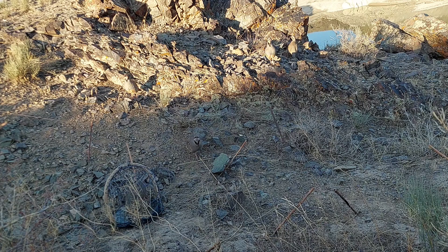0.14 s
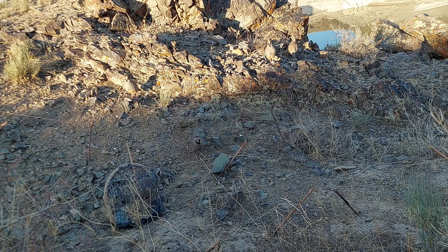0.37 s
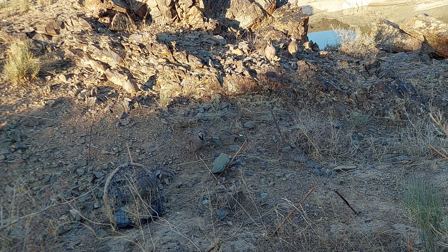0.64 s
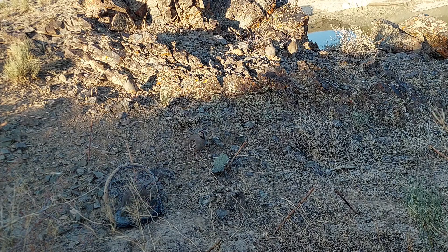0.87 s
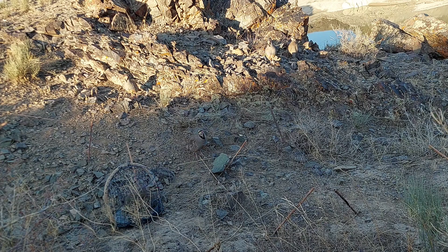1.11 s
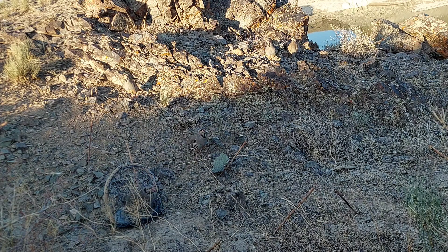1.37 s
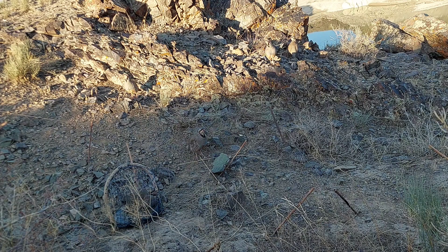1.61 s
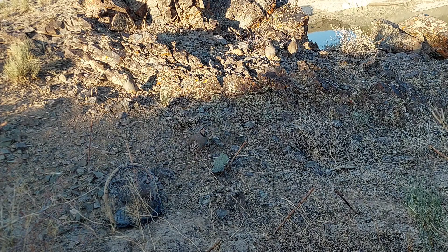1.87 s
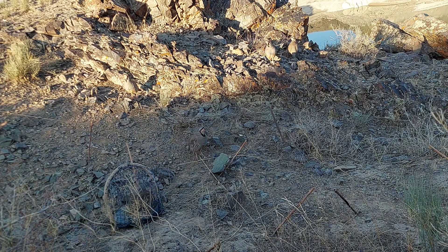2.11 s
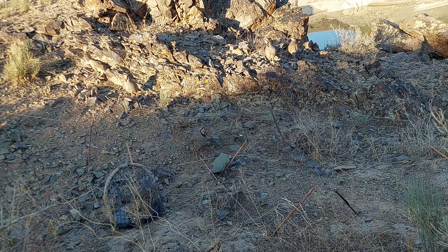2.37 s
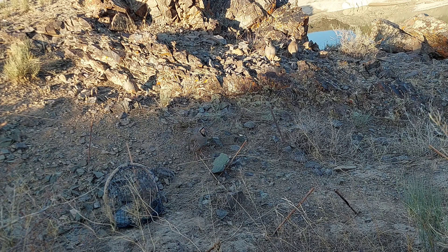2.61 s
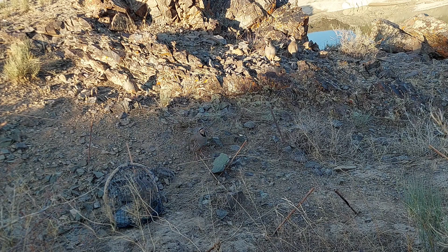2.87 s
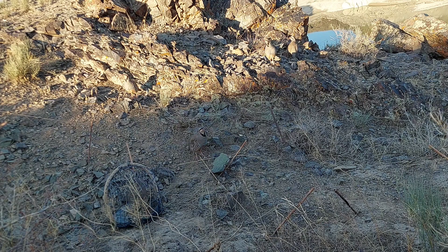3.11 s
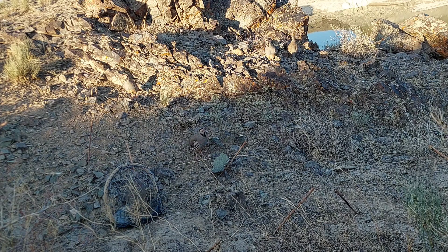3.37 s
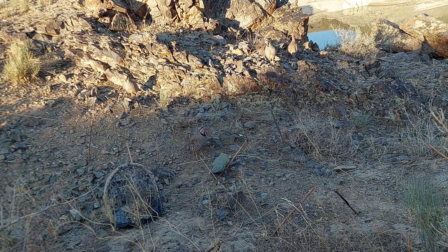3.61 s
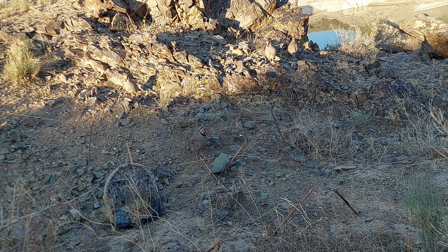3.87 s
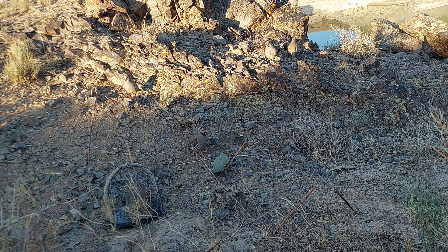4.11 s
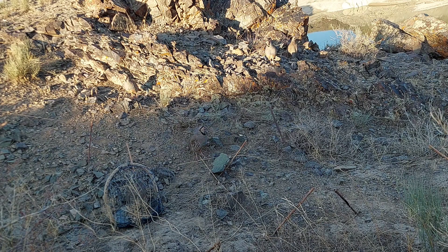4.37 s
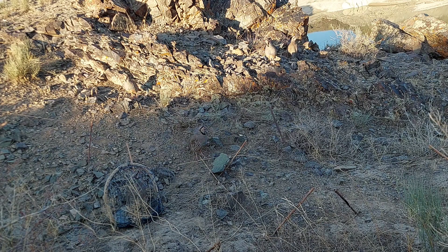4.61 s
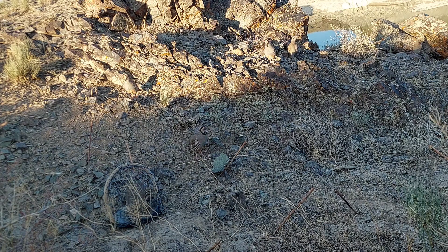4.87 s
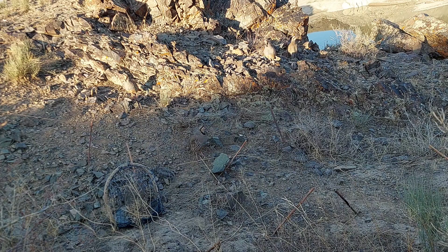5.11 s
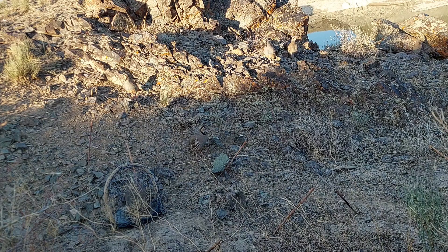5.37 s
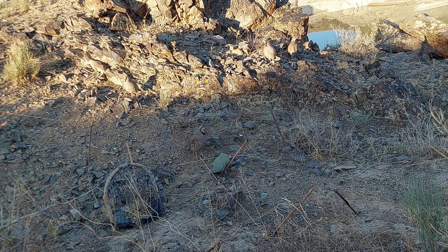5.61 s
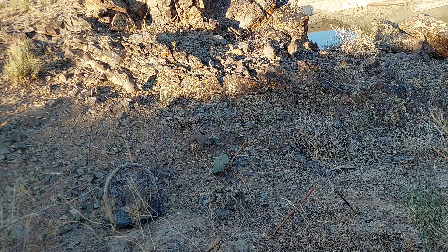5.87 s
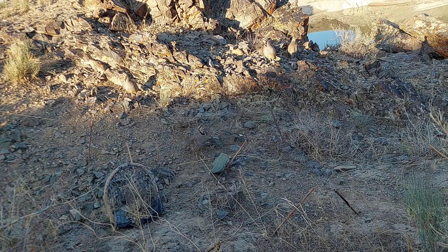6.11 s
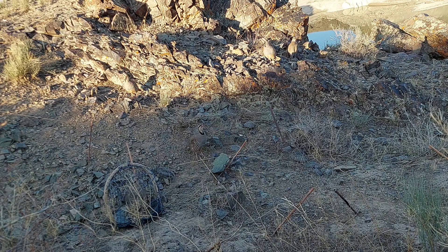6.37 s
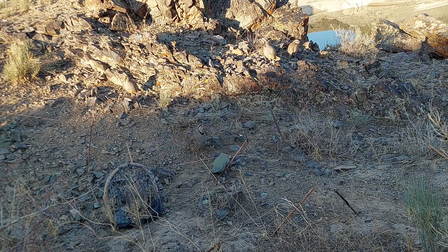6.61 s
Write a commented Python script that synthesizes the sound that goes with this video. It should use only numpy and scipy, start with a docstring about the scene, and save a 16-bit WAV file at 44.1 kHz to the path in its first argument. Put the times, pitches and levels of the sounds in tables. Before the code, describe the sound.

Partridges call outdoors on a dry rocky slope. Hoarse, throbbing clucks come in fast uneven bursts, with softer rounded clucks between them and brief thin squeals gliding upward or breaking down. Gaps shorten and lengthen throughout. Near the end a closer bird gives a few hollow, breathy notes, louder than the rest. Stereo microphone, calls slightly left, dry with only faint short scatter from rocks, quiet low air rumble beneath.

```python
"""Partridges call on a rocky hillside: hoarse clucks, made of pulses that ring chest, throat and beak.
Among them short squealing whistles sound, gliding near sines with overtones.
Near the end a closer bird adds hollow, breathy notes: noise that rings windpipe modes.
Rocks scatter short, dying noise echoes; light air rumbles as bands of stereo noise."""
import sys
import numpy as np
from scipy import signal
from scipy.io import wavfile
from scipy.ndimage import uniform_filter1d

SR = 44100
rng = np.random.default_rng(int(sys.argv[2]) if len(sys.argv) > 2 else 0)


def transcribe(signal):
    """Save signal, clipped to [-1, 1], as a 16-bit WAV file at the path in sys.argv[1]."""
    frames = np.atleast_2d(signal).T
    limited = np.clip(frames, -1, 1)
    pcm = np.round(limited * 32767).astype(np.int16)
    wavfile.write(sys.argv[1], SR, pcm)


def makeup_ratio(level_db):
    """Linear amplitude ratio for a level in decibels (20 dB per factor of ten)."""
    decades = np.asarray(level_db, float) / 20
    return 10 ** decades


N = 297234


def rms_one(x):
    """Normalization: divide by the root mean square to reach unit power."""
    return x / np.sqrt(np.mean(x ** 2) + 1e-20)


def at_hz(points, hz):
    """Linear interpolation of a table on a log-frequency axis."""
    table_hz, values = np.transpose(points)
    return np.interp(np.log(hz), np.log(table_hz), values)


def resonate(x, hz, width_hz):
    """Damped resonator: a pole pair sets centre and bandwidth; the gain is about 1 at the peak."""
    r = np.exp(-np.pi * width_hz / SR)
    poles = [1, -2 * r * np.cos(2 * np.pi * hz / SR), r * r]
    return signal.lfilter([(1 - r * r) / 2, 0, (r * r - 1) / 2], poles, x)


def wander(rate_hz):
    """Low-pass random process of unit spread: a double pole lets only slow chance through."""
    r = np.exp(-2 * np.pi * rate_hz / SR)
    white = rng.standard_normal(N + SR)
    return rms_one(signal.lfilter([1], [1, -2 * r, r * r], white)[SR:])


def swell(length, rise, power):
    """Amplitude envelope: a sine-shaped rise over the share `rise`, then a fall, raised to a power."""
    u, rise = np.linspace(0, 1, length), np.clip(rise, .05, .95)
    return np.sin(np.pi / 2 * np.minimum(u / rise, (1 - u) / (1 - rise))) ** power


def add(out, s, note):
    """Superposition: sum a note into the signal at time s in seconds."""
    at = max(round(s * SR), 0)
    out[at:at + len(note)] += note[:N - at]


def clucks(notes, jitter, hiss, rise, throat_width_hz, windpipe_db, chest_db, low_top_hz, crest,
           sag_below_hz, lift=0.0505, beak_lift=.1):
    """Source-filter voice: membrane pulses ring chest, throat and a beak that opens in mid-note."""
    # Each row: centre in Hz, width of the first of two stages in Hz, relative gain in dB.
    beak_modes = [(2600, 510, 4.5), (3290, 140, 15), (4250, 165, 14.5), (4823, 687, 7.5), (5590, 1200, -7),
                  (7300, 1200, -82.5), (11930, 960, -10), (13800, 1500, -17)]
    out, shake, breath = np.zeros(N), wander(90.), rng.standard_normal(N)
    stretch = 1.6   # leaves room for the soft onset and decay
    for s, ms, db, throat_hz, bright_db, pulse_hz in notes:
        start = s - ms * (stretch - 1) / 2000
        span = np.arange(round(ms * stretch * SR / 1000))
        u = span / len(span)
        here = np.clip(round(start * SR) + span, 0, N - 1)
        # the pulse rate climbs through a note, but sags in slow ones
        trend = rise * np.sign(pulse_hz - sag_below_hz)
        hz = pulse_hz * (1 + trend * (u - .5)) * np.exp(jitter * shake[here])
        cycle = np.cumsum(hz) / SR % 1
        pulses = np.diff(cycle, prepend=0) < 0
        # air hisses through just after each opening
        source = rms_one(pulses - np.mean(pulses)) + hiss * breath[here] * np.exp(-2.5 * cycle)

        throat = resonate(resonate(source, throat_hz, throat_width_hz), throat_hz, 4.2 * throat_width_hz)
        windpipe = resonate(resonate(source, 1147, 650), 600, 910)
        chest = resonate(resonate(source, 480, 350), 480, 550)
        low = rms_one(throat) + makeup_ratio(windpipe_db) * rms_one(windpipe) + makeup_ratio(chest_db) * rms_one(chest)
        low = signal.sosfilt(signal.butter(2, low_top_hz, fs=SR, output="sos"), rms_one(low))
        # the throat narrows: reading ever faster makes the resonances climb
        low = np.interp(span * (1 - lift + lift * u), span, low)
        beak = sum(makeup_ratio(g) * resonate(resonate(source, f, w), f, 2 * w) for f, w, g in beak_modes)
        beak = np.interp(span * (1 - beak_lift + beak_lift * u), span, beak)
        opening = swell(len(span), .55, 1.6)

        note = rms_one(low + makeup_ratio(bright_db) * rms_one(beak * opening))
        # steady breath evens the level
        note = note / (uniform_filter1d(note ** 2, size=300) + 0.033) ** 1.61
        add(out, start, makeup_ratio(db) * swell(len(span), crest, 3.4) * note)
    return out


def rasp_notes():
    """Coupled articulation: the throat follows the beak, the pulse rate the time left in the run."""
    # Hoarse rasping throbs.
    # Each row: start in seconds, length in ms before the stretch, level in dB before the evening,
    # brightness of the open beak in dB.
    rasps = [(0.006, 28, -35.5, -13), (0.036, 20, -34, -4.5), (0.064, 67, -38.5, -6.5),
             (0.126, 62, -39, -1), (0.199, 60, -44.5, 2), (0.258, 26, -36, 17), (0.303, 36, -38, -13.5),
             (0.351, 48, -37, -6), (0.401, 22, -35, 33), (0.425, 60, -32, -7), (0.674, 50, -35.5, -4.5),
             (0.736, 16, -37.5, 28), (0.768, 78, -31, -2), (0.851, 25, -37.5, 6), (0.884, 19, -38, 4),
             (0.922, 44, -37.5, 5.5), (0.974, 60, -42.5, -3.5), (1.031, 36, -40, -9.5),
             (1.183, 52, -42, -12.5), (1.23, 32, -31.5, 3.5), (1.268, 12, -33.5, 11), (1.297, 25, -35, 16),
             (1.328, 31, -32, 32), (1.355, 58, -29, 2), (1.413, 30, -37.5, 12), (1.588, 37, -39, -29.5),
             (1.74, 41, -43, -15.5), (1.795, 44, -45, -16), (1.864, 46, -40, -15), (1.915, 36, -40, -8),
             (1.963, 36, -45, -13.5), (2.124, 68, -36.5, -9.5), (2.229, 32, -46.5, 0.5),
             (2.261, 34, -49.5, -7.5), (2.74, 57.6, -42.5, -10.5), (2.776, 15, -35, 11),
             (2.809, 24, -35, 5), (2.833, 41, -36, 11.5), (2.899, 50, -32.5, 7.5), (2.95, 64, -33, -10.5),
             (3.228, 42, -38, -12.5), (3.271, 56, -35.5, -1.5), (3.328, 31, -37.5, 29),
             (3.364, 81, -37, -4), (3.43, 64, -35, 1), (3.492, 56, -30.5, -10), (4.005, 38, -30.5, -7.5),
             (4.045, 24, -30, 9.5), (4.073, 65, -40, 23.5), (4.116, 28, -28.5, 3),
             (4.151, 62, -32.5, -11.5), (4.589, 76, -36, -10.5), (4.665, 95, -30.5, -2.5),
             (4.763, 42, -36, -15.5), (5.061, 42, -51.5, -11.5), (5.172, 90, -33.5, -5),
             (5.238, 54, -32.5, -6.5), (5.3, 36, -31.5, 0), (5.336, 48, -34.5, -6.5), (5.444, 52, -41, -8),
             (5.631, 34, -35, -9), (5.665, 23, -31, -9.5), (5.699, 20, -32, 4), (5.733, 66, -36.5, -3.5),
             (5.803, 56, -37.5, -10), (5.858, 38, -41.5, -13), (6.151, 36, -33, -2.5),
             (6.268, 50, -43.5, 0), (6.317, 41, -41, -12), (6.383, 39, -46.5, -19.5),
             (6.535, 62, -40.5, -8), (6.595, 44, -43.5, -6), (6.689, 79, -37.5, -12)]
    # Throat resonance against beak opening. Each row: brightness in dB, resonance in Hz.
    throat = [(-15, 1115), (-3.5, 1720), (-8, 1780), (20, 1900)]
    # Pulses slow down as a run ends. Each row: seconds to the end of the run, pulse rate in Hz.
    run_down = [(.07, 525.4), (.125, 831.4)]
    pause_s = .065   # a longer silence ends a run
    s, ms, db, bright_db = np.transpose(rasps)
    ends = s + ms / 1000
    run_ends = ends[np.append(s[1:] - ends[:-1] > pause_s, True)]
    left_s = run_ends[np.searchsorted(run_ends, s)] - s
    throat_hz = np.interp(bright_db, *np.transpose(throat))
    pulse_hz = np.interp(left_s, *np.transpose(run_down))
    return zip(s, ms, db, throat_hz, bright_db, pulse_hz)


def cluck_notes():
    """Harmonic tuning: the throat resonance sits at one multiple of the pulse rate."""
    # Soft, evenly voiced clucks.
    # Each row: start in seconds, length in ms before the stretch, level in dB before the evening,
    # mean pulse rate in Hz, brightness of the open beak in dB.
    soft_clucks = [(0.614, 53, -39, 410, -9), (1.066, 50, -40.5, 420.3, -12.5),
                   (1.473, 38, -42.5, 505.4, -11.5), (1.696, 46, -42, 462.5, -13),
                   (2.313, 44, -45, 429.4, -15.5), (2.516, 40, -63, 420, -36), (2.561, 48, -46, 394, -31),
                   (3.079, 50, -41, 396.7, -14), (3.761, 53, -38, 375.6, -25.5), (3.965, 46, -49, 454, -13),
                   (4.428, 42, -38.5, 448.8, -20.5), (4.569, 24, -55, 432, -29.5),
                   (4.951, 40, -46, 507, -20), (5.005, 51, -37.5, 443, -12), (5.39, 65, -40.5, 406, -13.5),
                   (5.56, 40, -40, 559.3, -22), (5.589, 42, -37, 462.3, -10), (5.9, 63, -61, 386, -34),
                   (5.944, 53, -40.5, 369.7, -13), (5.992, 54, -44.5, 712, -15),
                   (6.099, 59, -39.5, 553.4, -12.5)]
    throat_multiple = 2.7
    return [(s, ms, db, throat_multiple * hz, bright_db, hz) for s, ms, db, hz, bright_db in soft_clucks]


def squeals(third_db=-7, under_db=-15):
    """Additive synthesis: gliding near sines with overtones; the middle register locks lines at thirds."""
    # Strength of the octave, by pitch. Each row: pitch in Hz, octave over fundamental in dB.
    octave = [(750, -48), (1050, -58.5), (1600, -2), (1900, -14), (2850, -6.5), (3300, -50.5)]
    fade_ms, waver, flutter_db = 3.5, .02, 3.0   # the last two are spreads: share of pitch, dB
    out, turns, pitch, level = np.zeros(N), 0, wander(55.), wander(40.)
    fade = round(fade_ms * SR / 1000)
    for s, ms, from_hz, to_hz, db in squeal_throbs():
        octave_db = at_hz(octave, from_hz)
        span = np.arange(round(ms * SR / 1000) + 2 * fade)
        here = np.clip(round(s * SR) - fade + span, 0, N - 1)
        # slides steepen, but high rising ones level off
        bend = .4 if 2600 < from_hz < to_hz else 1.6
        slide = np.linspace(0, 1, len(span)) ** bend
        hz = (from_hz + (to_hz - from_hz) * slide) * (1 + waver * pitch[here])
        phase = 2 * np.pi * (turns + np.cumsum(hz) / SR)
        turns = phase[-2 * fade] / (2 * np.pi)   # the next throb carries the swing on
        note = np.sin(phase) + makeup_ratio(octave_db) * np.sin(2 * phase)
        if from_hz < 2100:
            note += makeup_ratio(octave_db + third_db) * np.sin(3 * phase)
        elif 2600 < from_hz < 3000:
            # weaker lines at two thirds and five thirds of the pitch
            note += makeup_ratio(under_db) * (np.sin(2 / 3 * phase) + np.sin(5 / 3 * phase))
            note += makeup_ratio(-30.5) * np.sin(4 * phase) + makeup_ratio(-53) * np.sin(3 * phase)
        edges = np.clip(np.minimum(span, span[::-1]) / (2 * fade), 0, 1)
        gain = np.sqrt(2) * makeup_ratio(db + flutter_db * level[here])
        add(out, s - fade / SR, gain * edges * note)
    return out


def squeal_throbs():
    """Frequency modulation plan: every squeal as throbs (s, ms, from Hz, to Hz, dB) in time order."""
    # Clean squeals, squeals that break downwards, and squeals that shoot upwards.
    # Each row: start in seconds, length in ms between half-faded edges, middle pitch in Hz,
    # level of the fundamental in dB before flutter.
    clean = [(0.012, 11.7, 1824, -47.5), (0.043, 18, 1680, -43.5), (0.134, 23, 3950, -43.5),
             (0.165, 85, 5846, -47), (0.181, 58, 2900, -49), (0.267, 12.5, 1632, -32.5),
             (0.401, 9, 1856, -35), (0.626, 24, 806, -43), (0.701, 20, 1904, -46), (0.745, 13, 4600, -43),
             (0.795, 20.6, 1599, -32.5), (0.826, 85.4, 2798, -41), (0.931, 18, 1605, -36.5),
             (1.18, 20, 1124, -48), (1.228, 20, 1628, -34.5), (1.261, 100, 2908, -45),
             (1.271, 24, 4250, -40.5), (1.302, 11, 4495, -32), (1.337, 18, 4390, -33.5),
             (1.43, 18, 1913, -33), (2.137, 20, 1653, -40.5), (2.166, 48, 2840, -46.5),
             (2.235, 20, 2880, -42.5), (2.574, 28, 906, -39.5), (2.783, 50, 1870, -47.5),
             (2.795, 107, 2758, -40.5), (2.905, 34, 1738, -39), (3.262, 22, 1695, -39),
             (3.285, 34, 1885, -40), (3.305, 144, 2847, -40), (3.462, 12, 4160, -40),
             (3.462, 24, 1775, -36.5), (3.786, 26, 931, -40.5), (3.997, 28, 1614, -45.5),
             (4.053, 20, 1844, -36.5), (4.078, 16, 1618, -35.5), (4.083, 18, 4250, -39.5),
             (4.13, 13, 4250, -28), (4.445, 28, 1011, -40.5), (4.628, 21.3, 1699, -32),
             (4.662, 15.2, 1636, -33.5), (4.682, 24, 1796, -45), (4.685, 30, 1076, -40),
             (4.686, 50, 4233, -47.5), (4.689, 16, 2512, -37), (4.96, 18, 1065, -40),
             (5.016, 32, 1011, -35), (5.21, 44, 1628, -34.5), (5.251, 38, 1885, -63),
             (5.269, 71, 2791, -37), (5.555, 36, 1050, -45.5), (5.596, 24, 927, -42),
             (5.674, 17, 1650, -39), (5.7, 18, 1560, -37), (5.72, 82, 2650, -43), (5.803, 30, 1595, -42.5),
             (5.824, 22, 1012, -43.5), (5.86, 36, 960, -46), (5.99, 37, 720, -61), (6.159, 24, 1742, -37.5),
             (6.2, 20, 2725, -41), (6.256, 16, 3697, -41.5), (6.289, 33, 2726, -40.5),
             (6.331, 30, 1547, -42.5)]
    falls = [(0.978, 28, 1088, -48), (1.097, 14, 1130, -36.5), (1.208, 20, 1700, -37.5),
             (1.363, 20, 1477, -33.5), (1.398, 33, 2717, -48), (1.357, 10, 2720, -41),
             (2.900, 14, 2600, -55.5), (3.45, 10, 2654, -47), (3.503, 12, 4400, -36),
             (4.03, 16, 1728, -35.5), (4.155, 14, 2868, -44.5), (4.734, 20, 1636, -38)]
    leaps = [(0.741, 8.6, 2940, -49), (2.269, 18.4, 2734, -45.5), (3.497, 12, 2941, -39.5),
             (5.04, 20, 1911, -46), (6.555, 38, 2490, -51.5)]
    # Upward slide of each throb of a clean squeal. Each row: pitch in Hz, share of the pitch.
    slide_share = [(920, .12), (1020, 0.015), (1620, .08), (1850, 0.082), (2550, 0.085), (2850, .06),
                   (4300, 0.071), (5850, .0)]
    # Depth of the downward breaks. Each row: pitch in Hz, share of the pitch.
    fall_share = [(1100, .08), (1700, .14), (2800, .26)]
    leap_share = 0.32
    throb_ms, throb_share = 33, 0.97   # approximate spacing of throbs, and the share that sounds
    held_from_ms = 96   # the longest squeals are held in one piece

    rows = [(s, ms, hz, db, -at_hz(fall_share, hz)) for s, ms, hz, db in falls]
    rows += [(*row, leap_share) for row in leaps]
    for s, ms, hz, db in clean:
        count = max(round(ms / throb_ms), 1) if ms < held_from_ms else 1
        share = throb_share if count > 1 else 1
        each_ms = ms / count
        for k in range(count):
            rows.append((s + k * each_ms / 1000, share * each_ms, hz, db, at_hz(slide_share, hz)))
    return sorted((s, ms, hz * (1 - slide / 2), hz * (1 + slide / 2), db) for s, ms, hz, db, slide in rows)


def hollow_notes(stretch=1.274, sag=0.033, hum_db=-26, hum_from_hz=520, hum_to_hz=320):
    """Noise-driven resonance: turbulent breath rings the windpipe's modes over a faint falling hum."""
    # Notes of the closer bird.
    # Each row: start in seconds, length in ms before the stretch, level in dB before the evening,
    # windpipe resonance at the onset in Hz.
    hollow = [(6.194, 51.7, -18.5, 1338), (6.433, 26, -20.5, 1394), (6.457, 40.5, -16, 1380),
              (6.638, 38.2, -20.5, 1362)]
    # Windpipe modes.
    # Each row: multiple of the lowest mode, width of the first of two stages in Hz, relative level in dB.
    modes = [(1.0, 267, -11.5), (2.1, 920, -56), (3.15, 430, -31), (4.2, 270, -69), (5.5, 300, -51.5),
             (9.2, 1000, -52)]
    out, breath = np.zeros(N), rng.standard_normal(N)
    for s, ms, db, pipe_hz in hollow:
        span = np.arange(round(ms * stretch * SR / 1000))
        air = breath[np.minimum(round(s * SR) + span, N - 1)]
        pipe = 0
        for multiple, width_hz, mode_db in modes:
            hz = multiple * pipe_hz
            pipe = pipe + makeup_ratio(mode_db) * rms_one(resonate(resonate(air, hz, width_hz), hz, 1.04 * width_hz))
        pipe = np.interp(span * (1 - sag * span / len(span)), span, pipe)   # the pitch sags
        pipe = pipe / (uniform_filter1d(pipe ** 2, size=200) + 0.13) ** 0.22   # evens the level
        hum = np.sin(2 * np.pi * np.cumsum(np.linspace(hum_from_hz, hum_to_hz, len(span))) / SR)
        hum = hum * swell(len(span), .7, 1.5)
        outline = swell(len(span), .35, 1.1)
        add(out, s - .002, makeup_ratio(db) * outline * (pipe + makeup_ratio(hum_db) * hum))
    return out


def hillside(x, lag, sway, left_db):
    """Arrival-time and level differences place a moving head; diffuse reflection adds each port's scatter."""
    near_rocks_db, near_rocks_t60_s = -24, .03
    slope_db, slope_t60_s = -45, 0.19
    scatter_from_hz = 1490
    clock, shift = np.arange(N), (lag + sway * wander(5.1)) / 2   # lag and sway in samples
    direct = np.array([np.interp(clock - shift, clock, x), np.interp(clock + shift, clock, x)])
    s = np.arange(SR // 4) / SR
    dying = makeup_ratio(near_rocks_db - 60 * s / near_rocks_t60_s) + makeup_ratio(slope_db - 60 * s / slope_t60_s)
    rocks = rng.standard_normal((2, len(s))) * dying
    thin = signal.sosfilt(signal.butter(1, scatter_from_hz, "high", fs=SR, output="sos"), x)
    scatter = np.array([signal.fftconvolve(thin, r)[:N] for r in rocks])
    return direct * makeup_ratio([[left_db / 2], [-left_db / 2]]) + scatter


def open_air():
    """Band-filtered noise of partial coherence: half-octave bands in stereo, the low ones in lumps."""
    # Spectrum of the air. Each row: frequency in Hz, relative density in dB.
    spectrum = [(15, -38.5), (25, -13), (91, -5), (152, -5.5), (193, -14.5), (368, -14.5), (445, -17.5),
                (782, -21.5), (5880, -46.5), (9550, -41.5), (11800, -42.5), (15500, -68)]
    # Course of the rumble. Each row: time in seconds, level in dB.
    course = [(0.0, -48.5), (0.172, -61.5), (6.74, -57)]
    # Lean of the stereo image. Each row: frequency in Hz, left over right in dB.
    left_over_right = [(60, 5.5), (240, 12.5), (950, -3), (3770, 8), (15000, -8)]
    # Likeness of the two ports. Each row: frequency in Hz, correlation from 0 to 1.
    likeness = [(60, 0.54), (300, 0.39), (1000, .3), (8000, .05)]
    out, edges, gust = 0, 20 * 2 ** np.arange(0, 9.8, .5), wander(3.0)
    white = rng.standard_normal((2, 2, N))   # neighbouring bands take turns between two noises
    for k, (low, high) in enumerate(zip(edges, edges[1:])):
        band = signal.butter(2, [low, high], "band", fs=SR, output="sos")
        mid, side = signal.sosfilt(band, white[k % 2])
        hz = np.sqrt(low * high)
        alike = np.clip(at_hz(likeness, hz), 0, 1)
        lean_db = at_hz(left_over_right, hz) / 2
        gain = makeup_ratio(at_hz(spectrum, hz) + np.array([[lean_db], [-lean_db]]) + 2.0 * gust * (hz < 300))
        out = out + gain * (np.sqrt(1 + alike) * mid + np.sqrt(1 - alike) * side * [[1], [-1]])
    # the ports shed the deepest bass
    out = signal.sosfilt(signal.butter(2, 42, "high", fs=SR, output="sos"), rms_one(out))
    out = out + 2.5 * resonate(out, 65, 16)   # a dull hum stands out of the rumble
    s, db = np.transpose(course)
    return rms_one(out) * makeup_ratio(np.interp(np.arange(N) / SR, s, db))


def scene():
    """Linear superposition: the calls, stronger on the left, are summed with the open air."""
    rasps = clucks(rasp_notes(), jitter=.13, hiss=.33, rise=.15, throat_width_hz=420, windpipe_db=-8,
                   chest_db=-15, low_top_hz=3000, crest=.52, sag_below_hz=620)
    clear = clucks(cluck_notes(), jitter=.05, hiss=.6, rise=.12, throat_width_hz=500, windpipe_db=0,
                   chest_db=-13, low_top_hz=1800, crest=.45, sag_below_hz=0)
    flock = hillside(rasps + clear, lag=2.75, sway=0.84, left_db=3.0)
    flock = flock + hillside(squeals(), lag=0.92, sway=0.17, left_db=2.5)
    closer = hillside(hollow_notes(), lag=0.75, sway=0.9, left_db=2.0)
    return flock + closer + open_air()


def low_pass(x):
    """Removes everything above the highest recorded frequency."""
    return signal.sosfilt(signal.butter(12, 15710, fs=SR, output="sos"), x)


def record(dry):
    """Signal chain: the finished mix passes through one last stage."""
    return low_pass(dry)


dry = scene()
out = record(dry)
transcribe(out)
```